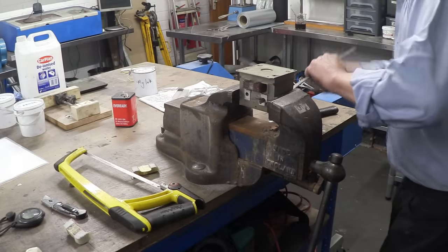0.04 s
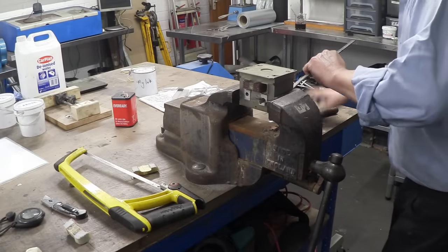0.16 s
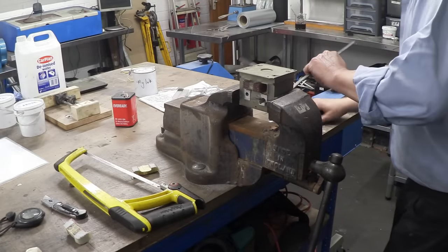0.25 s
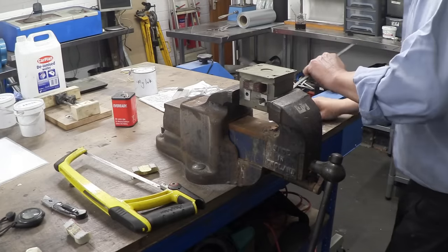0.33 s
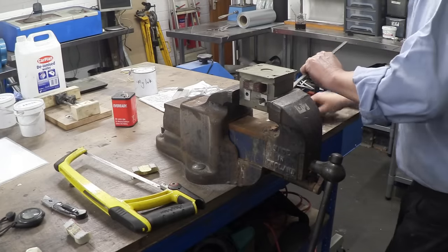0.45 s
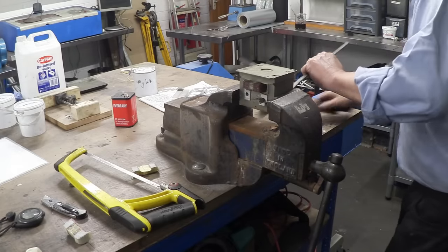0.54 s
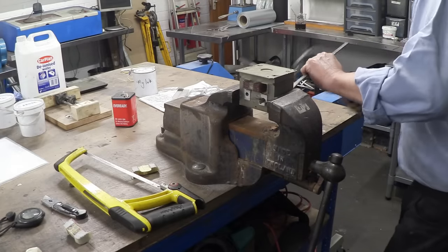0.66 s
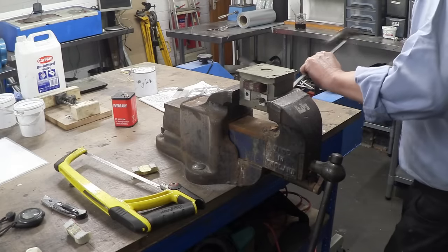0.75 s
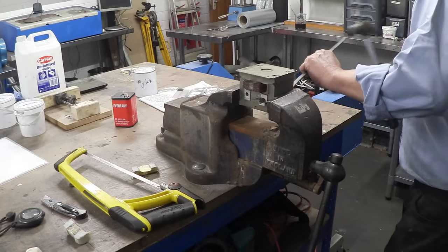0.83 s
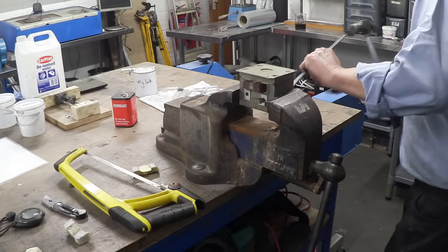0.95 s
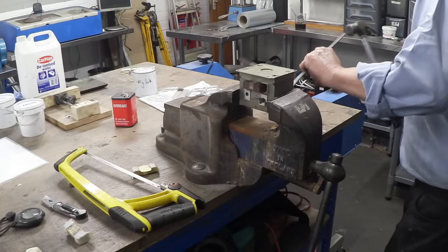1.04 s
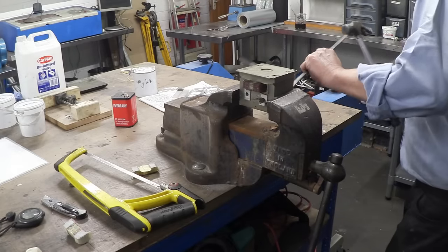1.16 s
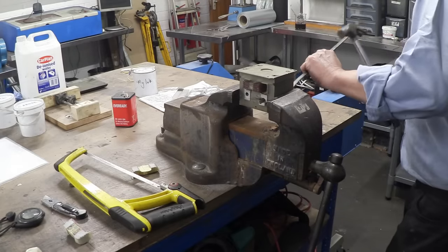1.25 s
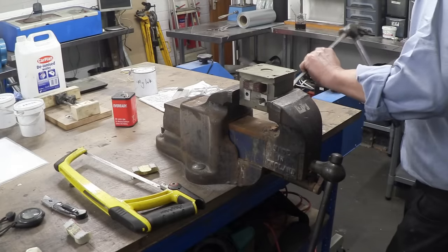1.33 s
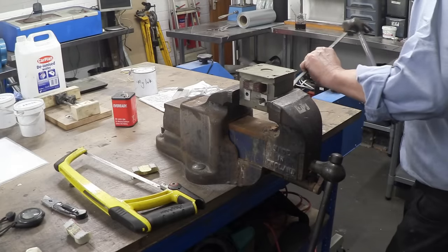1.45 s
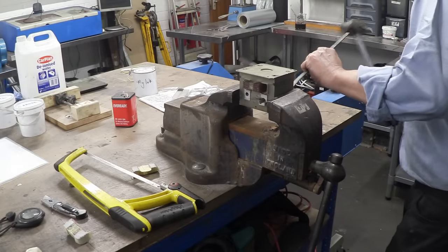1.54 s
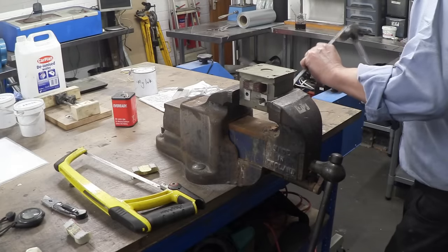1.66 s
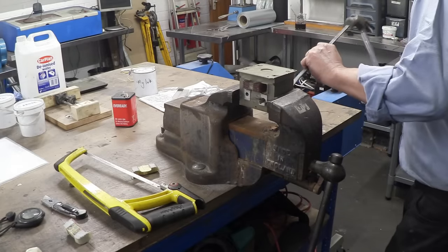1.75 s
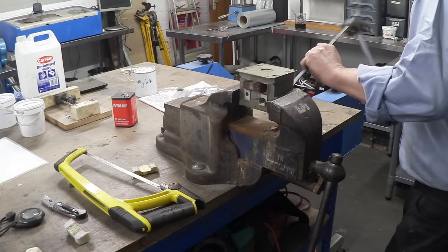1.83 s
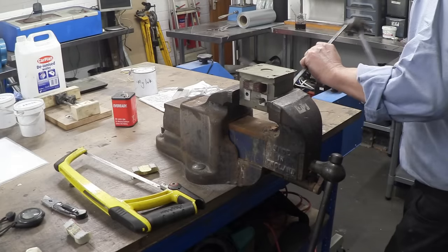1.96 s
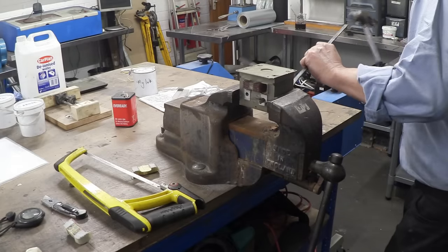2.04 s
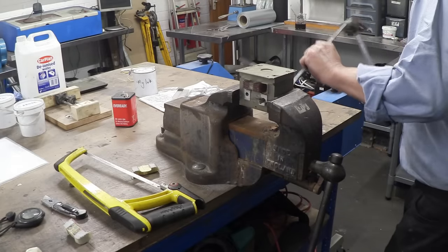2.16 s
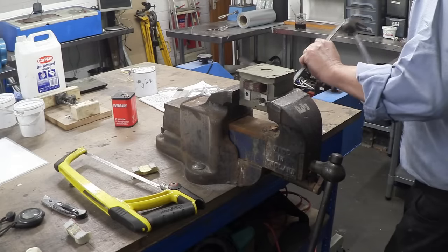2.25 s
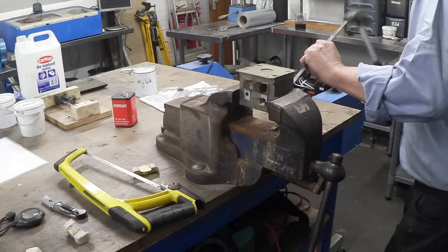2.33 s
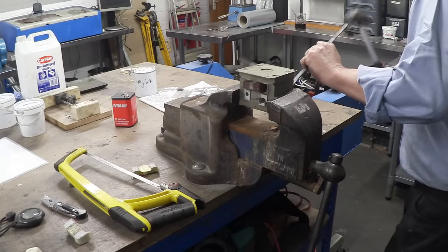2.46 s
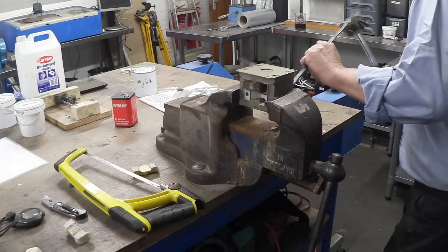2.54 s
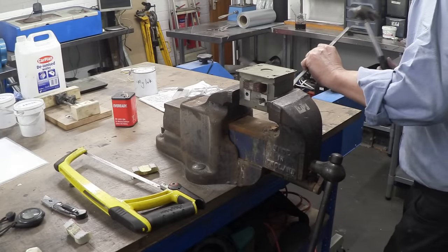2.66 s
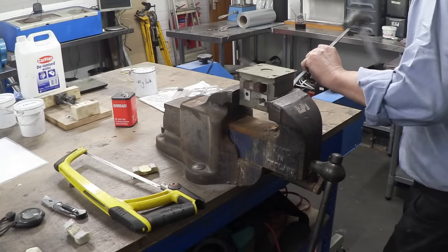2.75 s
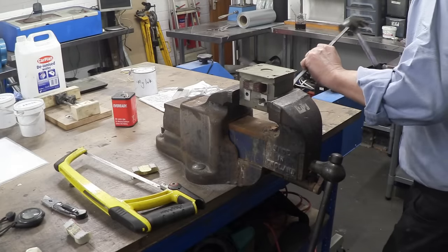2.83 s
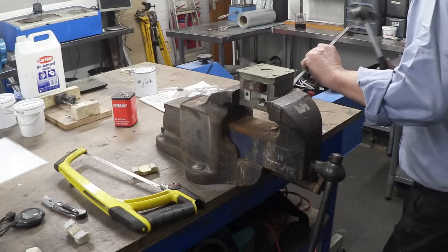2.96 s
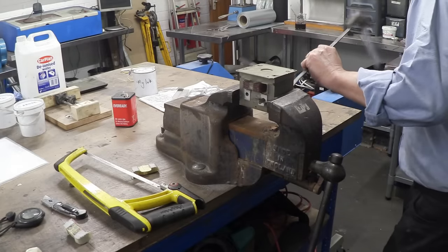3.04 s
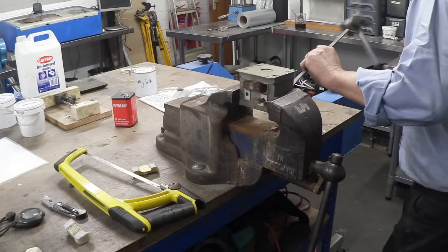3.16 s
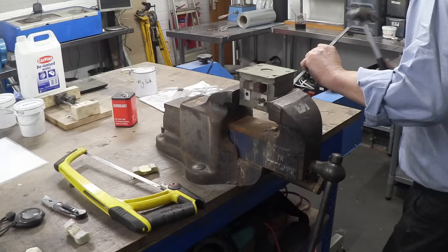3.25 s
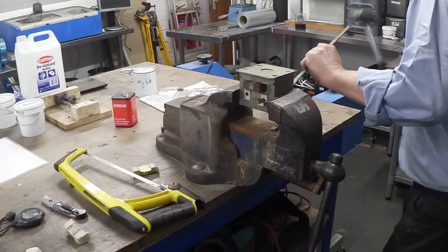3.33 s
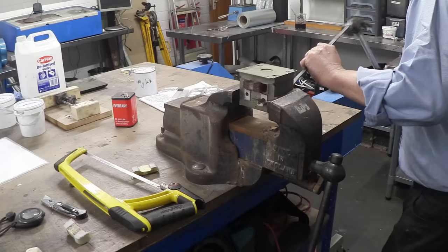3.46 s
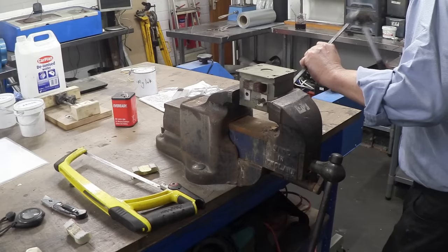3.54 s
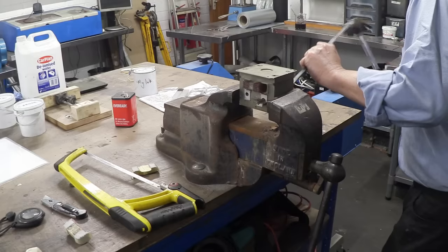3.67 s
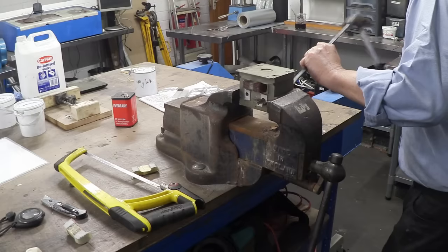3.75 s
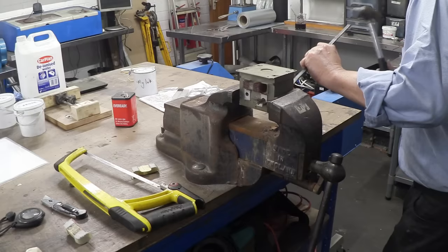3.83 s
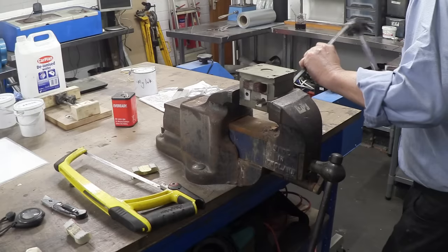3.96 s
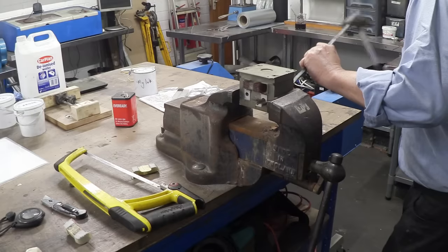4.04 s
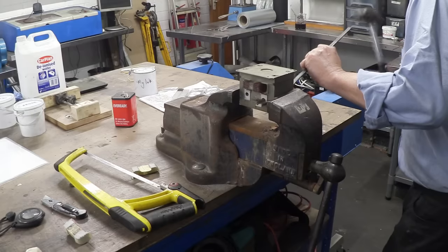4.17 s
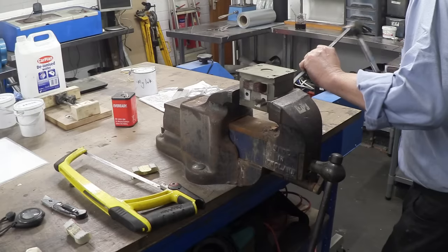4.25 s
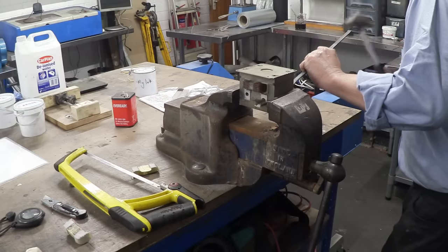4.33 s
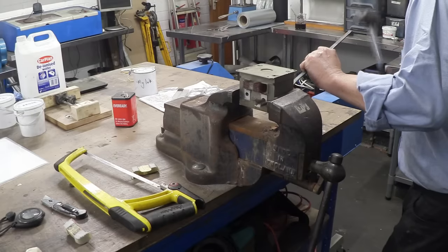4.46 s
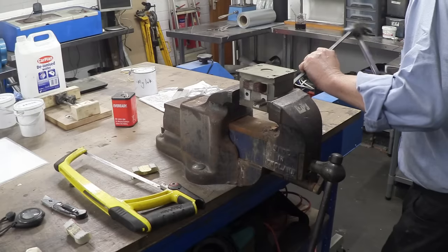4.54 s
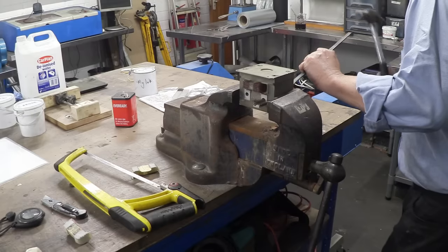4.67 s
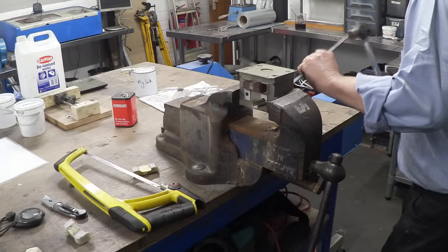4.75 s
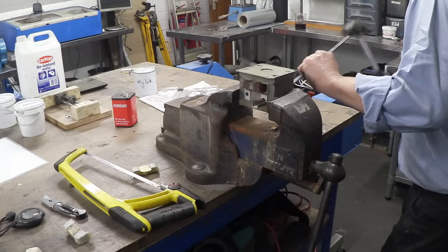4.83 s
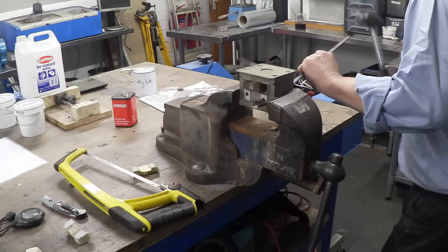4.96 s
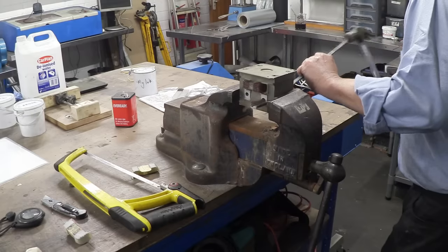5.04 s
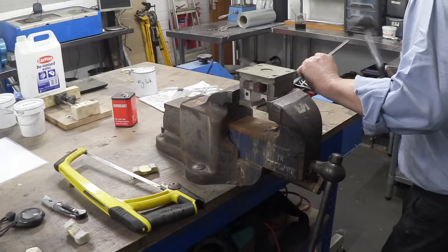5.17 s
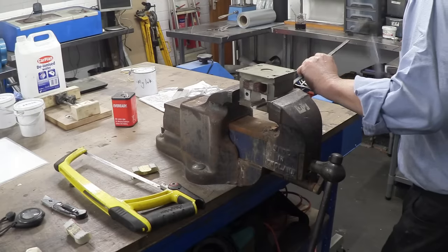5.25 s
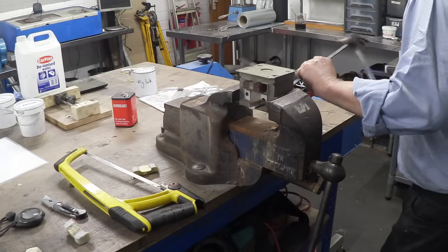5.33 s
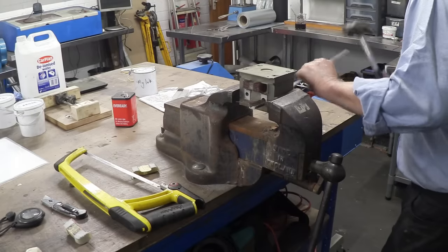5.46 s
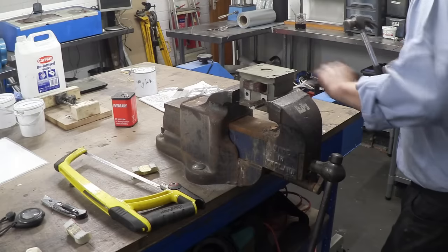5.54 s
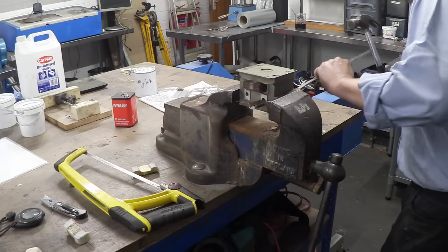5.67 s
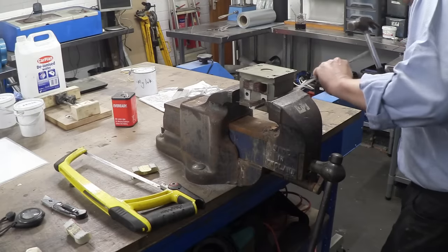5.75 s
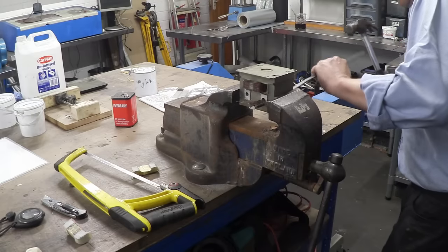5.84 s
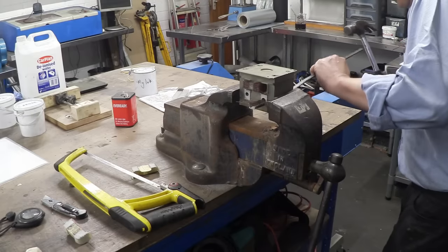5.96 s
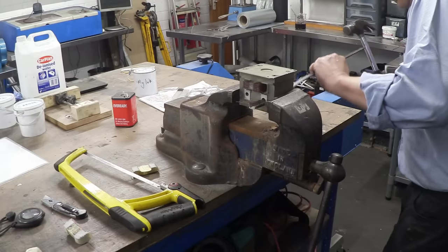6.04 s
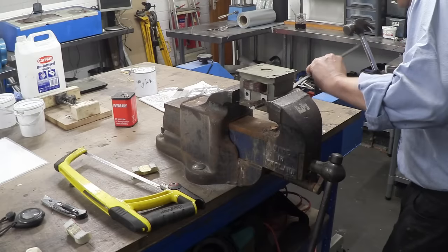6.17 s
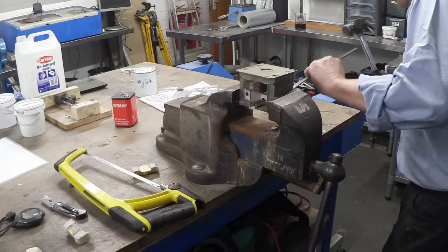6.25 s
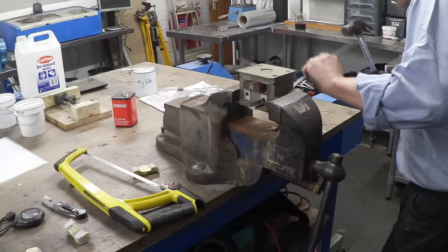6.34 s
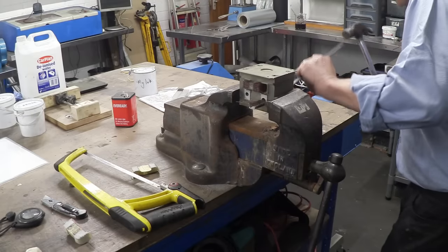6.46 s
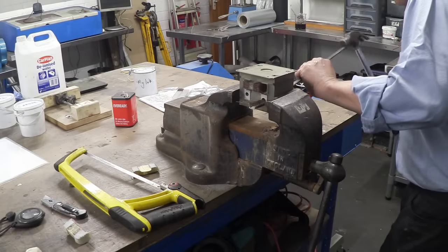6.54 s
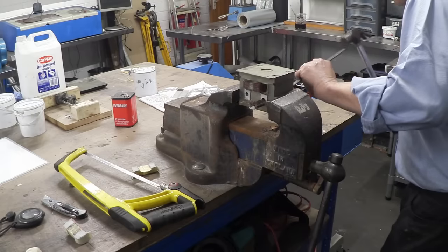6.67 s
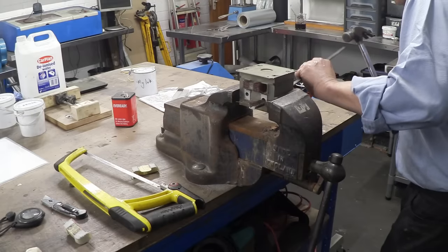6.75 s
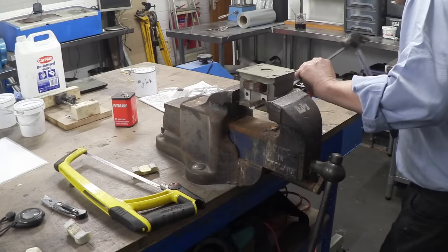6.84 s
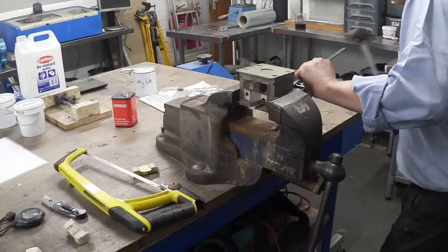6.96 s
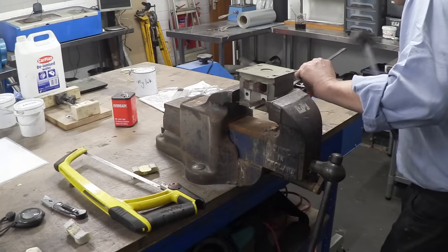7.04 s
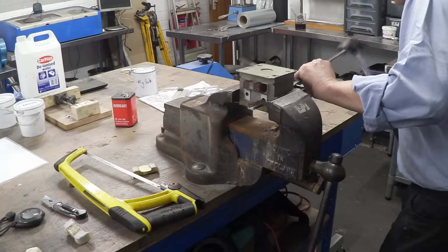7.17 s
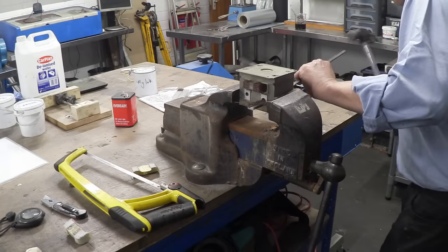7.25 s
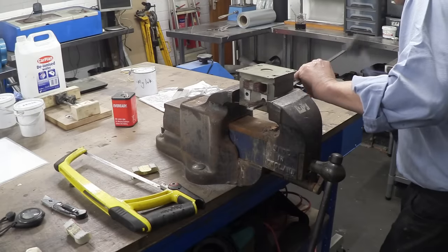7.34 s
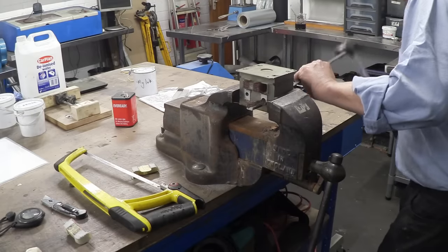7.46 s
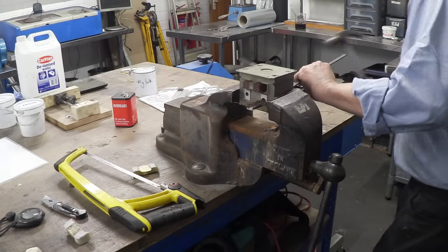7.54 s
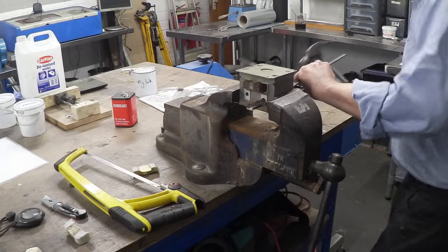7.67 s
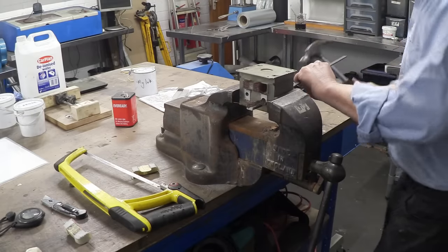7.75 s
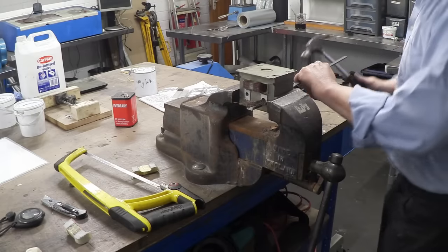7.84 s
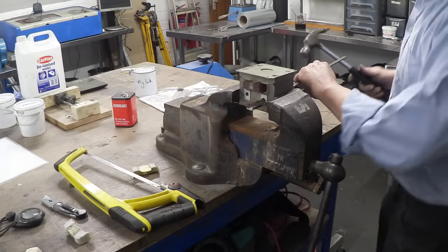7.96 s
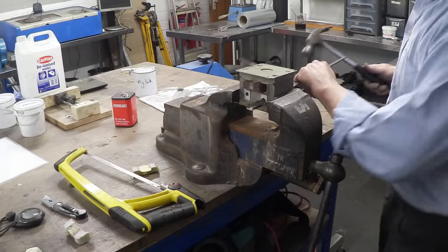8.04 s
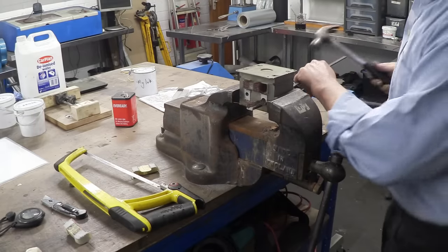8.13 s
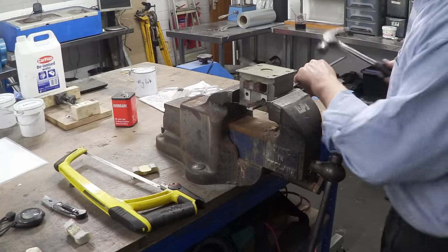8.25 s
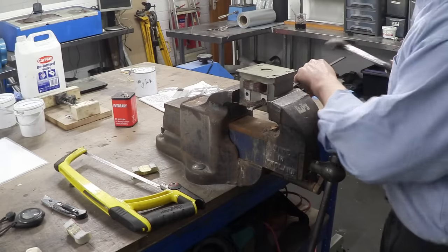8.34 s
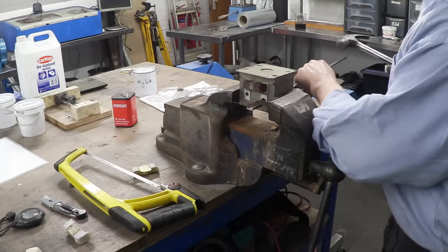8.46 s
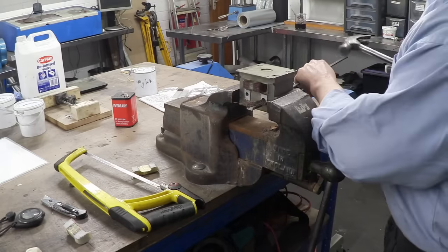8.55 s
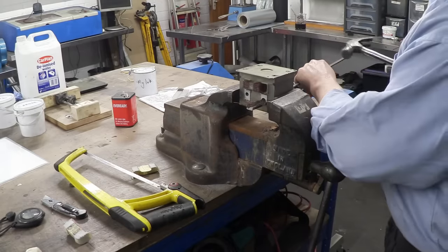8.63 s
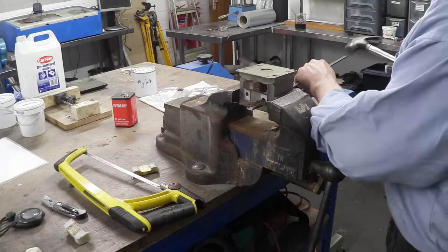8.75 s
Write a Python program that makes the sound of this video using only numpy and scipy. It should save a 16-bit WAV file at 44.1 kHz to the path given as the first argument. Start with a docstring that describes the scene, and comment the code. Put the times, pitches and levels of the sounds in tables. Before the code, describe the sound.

In a small workshop, tools tap and scrape over a faint ventilation murmur. A hammer then strikes a steel bar in a steady run of sharp blows, each with a short ring, a metallic rattle and a thump from the bench. The blows turn brighter and hollower. After a pause with small tool sounds, four more build in force. A few scrapes and a soft sleeve rustle follow, all heard close up.

```python
"""Over a ventilation murmur and a brief hiss, tools tap and scrape on the bench of a small workshop.
From 1.4 s a hammer drives a hand-held steel bar against the coil in a transformer core. Each blow
cracks, rattles the core's sheets, rings the steel and thumps the bench. Between 3 and 4.8 s the coil
works loose and the blows turn brighter and hollower. After a pause with small tool sounds, four more
blows build from 6.7 s. The tools tap and scrape once more, and from 8.1 s a shirt sleeve rustles."""
import sys
import numpy as np
from scipy import signal
from scipy.fft import rfft, irfft
from scipy.io import wavfile
from scipy.ndimage import uniform_filter1d

SR = 44100
rng = np.random.default_rng(int(sys.argv[2]) if len(sys.argv) > 2 else 0)


def file_out(sig):
    """Save sig as 16-bit WAV at sys.argv[1]."""
    # one column per channel
    cols = np.atleast_2d(sig).T
    # limit, then scale
    lim = np.clip(cols, -1, 1)
    pcm = np.round(lim * 32767).astype(np.int16)
    wavfile.write(sys.argv[1], SR, pcm)


N = 388080
EVENT_SAMPLES = 20480
AGE = np.arange(EVENT_SAMPLES) / SR  # seconds into one event
FREQ = np.fft.rfftfreq(EVENT_SAMPLES, 1 / SR) + 1  # frequency axis of an event's EQ, in Hz


def undb(db):
    """Decibels to gain."""
    return 10 ** (np.asarray(db) / 20)


def decay(t60):
    """Exponential decay that falls 60 dB in t60 seconds."""
    return np.exp(-np.log(1000) * AGE / max(t60, 1e-4))


def unit_energy(x):
    """Scale to an energy of 1."""
    return x / np.sqrt(np.sum(x ** 2))


def eq_curve(points, hz=FREQ):
    """Join (freq_hz, value) points on a log-frequency axis."""
    freqs, values = np.transpose(points)
    return np.interp(np.log(hz), np.log(freqs), values)


def bell(hz, width, db):
    """EQ bell of a well-damped resonance; width is a share of its pitch."""
    return db * np.exp(-((FREQ / hz - 1) / width) ** 2)


def equalise(x, eq_db):
    """Minimum-phase EQ, so nothing rings ahead of an attack."""
    size = EVENT_SAMPLES
    cepstrum = irfft(np.log(undb(eq_db)))
    cepstrum[1:size // 2] *= 2
    cepstrum[size // 2 + 1:] = 0
    impulse = irfft(np.exp(rfft(cepstrum)))
    return irfft(rfft(x, 2 * size) * rfft(impulse, 2 * size))[:size]


def white():
    """White noise, one event long."""
    return rng.standard_normal(EVENT_SAMPLES)


def noise_bed(points):
    """Scene-long noise of rms 1, shaped by (freq_hz, level_db) points."""
    gain = undb(eq_curve(points, np.fft.rfftfreq(N, 1 / SR) + 1))
    x = irfft(rfft(rng.standard_normal(N)) * gain, N)
    return x / x.std()


def fader(points):
    """Gain ride through (time_s, level_db) points."""
    return undb(np.interp(np.arange(N) / SR, *np.transpose(points)))


def place(track, start_s, x):
    """Mix an event into a track."""
    i = int(start_s * SR)
    track[i:i + len(x)] += x[:N - i]


# Tone of the ventilation: freq_hz, level_db
VENT_SPECTRUM = [(18, -32.5), (30, -4.5), (66, -4), (204, 0.5), (221, 0.5), (437, -5), (780, -12.5),
                 (889, -11.5), (1590, -15.5), (3140, -15.5), (4080, -17.5), (5740, -19), (16000, -30.5)]


def ventilation(side_db=-9):
    """A steady murmur of air, centred in the bass and wider above."""
    side_spectrum = [(hz, db + min(0, 8 * np.log2(hz / 1200))) for hz, db in VENT_SPECTRUM]
    mid = noise_bed(VENT_SPECTRUM)
    side = undb(side_db) * noise_bed(side_spectrum)
    return undb(-53.5 - 4) * np.array([mid + side, mid - side])


# Swell of the hiss: time_s, level_db
HISS_SWELL = [(0, -61.5), (.7, -56), (1.2, -76), (8.8, -75)]


def hiss():
    """A faint, wide hiss swells and sinks away at the opening."""
    spectrum = [(300, -10.5), (2500, 3.5), (5000, 0), (9000, -2.5), (12500, -2.5), (16000, -18.5)]
    return fader(HISS_SWELL) * np.array([noise_bed(spectrum) for _ in range(2)])


# Bands of the room's reverb: centre_hz, level_db, t60_s, side_db
REVERB_BANDS = [(100, 0, .45, -17), (250, -2.5, 0.13, -20.5), (510.3, 5.5, 0.43, -9.5),
                (1260, -1, 0.23, -2), (2130, -4, 0.25, -6), (4400, -8, 0.29, -4.5), (7850, -2, 0.23, -6),
                (15180, -2.5, 0.21, -5.5)]


def reverb_tail(build_s=0.0062, late_db=-27, late_t60=0.62):
    """Diffuse reflections build fast and die band by band over a faint late tail; gives mid and side."""
    centres_hz = [band[0] for band in REVERB_BANDS]
    onset = 1 - np.exp(-(AGE / build_s) ** 2)
    spectra = rfft(rng.standard_normal((2, EVENT_SAMPLES)))
    mid, side = np.zeros((2, EVENT_SAMPLES))
    for (_, level_db, t60, side_db), solo in zip(REVERB_BANDS, np.eye(len(centres_hz))):
        band = irfft(spectra * eq_curve(np.c_[centres_hz, solo]))
        envelope = unit_energy(onset * (decay(t60) + undb(late_db) * decay(late_t60)))
        tail = band * undb(level_db) * envelope
        mid += tail[0]
        side += undb(side_db) * tail[1]
    return mid, side


# Early reflections off bench top, vice and walls: delay_s, level_db
REFLECTIONS = [(.0055, -9.5), (0.0114, -16), (0.0193, -14), (.0295, -13.5)]


def workshop(x, smear_t60=0.03, scatter_db=-11):
    """The small room from close up, in stereo: direct sound, early reflections and a short tail."""
    mid, side = reverb_tail()
    mid[0] += 1  # direct sound
    # the nearest surface mirrors the sound; cluttered ones further off smear it
    for k, (delay_s, level_db) in enumerate(REFLECTIONS):
        echo = unit_energy(white() * decay(smear_t60 if k else 0))
        mid += undb(level_db) * np.roll(echo, int(delay_s * SR))
    # nearby objects scatter the treble differently to left and right
    scatter = unit_energy(white() * np.sqrt(AGE) * decay(.008))
    side += equalise(scatter, eq_curve([(200, -24), (1200, 1.5), (2500, -5.5), (8000, 8)]) + scatter_db)
    tilt_db = eq_curve([(4000, 0), (8000, -1.3)])
    left, right = equalise(mid + side, tilt_db), equalise(mid - side, -tilt_db)
    return np.array([signal.fftconvolve(x, response)[:N] for response in (left, right)])


# The sleeve's gesture: time_s, speed_db
SLEEVE_MOVE = [(8.14, -62), (8.242, -61.5), (8.264, -54), (8.354, -58), (8.394, -48.5), (8.614, -60),
               (8.662, -46.5), (8.764, -43.5), (8.8, -64)]
# Tone of rubbing cloth: freq_hz, level_db
CLOTH_SPECTRUM = [(240, -4), (500, -0.5), (900, 1.5), (2500, 4), (4380, 2.5), (7630, -0.5), (12900, -13.5),
                  (16000, -26)]


def sleeve(start_s=8.1, fade_in_s=0.13, flutter_db=2.5, trim_db=-1, brighten=0.74):
    """Cloth slides over cloth in small uneven catches; its low rub swells less than its bright hiss."""
    steps = np.repeat(rng.standard_normal(N // 400 + 1), 400)
    catches = uniform_filter1d(steps, size=300)[:N]
    speed = fader(SLEEVE_MOVE)
    fade_in = np.clip((np.arange(N) / SR - start_s) / fade_in_s, 0, 1)
    cloth = noise_bed(CLOTH_SPECTRUM)
    lows = signal.sosfiltfilt(signal.butter(2, 3000, fs=SR, output="sos"), cloth)
    highs = cloth - lows
    rub = highs + lows * (2 * speed / speed.max()) ** -brighten
    return rub * speed * fade_in * undb(trim_db + flutter_db * catches)


# Short scrapes over steel and bench top: start_s, level_db, length_s, centre_hz, width_hz
SCRAPES = [(0.309, -39.5, 0.022, 1860, 6000), (0.315, -41, 0.04, 202, 177), (0.346, -36, 0.035, 2170, 4460),
           (0.428, -44.5, 0.112, 227, 120), (0.432, -49, 0.037, 1370, 4000),
           (0.509, -47.5, 0.044, 1690, 4840), (5.557, -50, 0.039, 1425, 333),
           (6.463, -49, 0.059, 2900, 6900), (6.54, -54, 0.043, 3850, 9000), (7.67, -47, 0.054, 3520, 7860),
           (8.036, -45, 0.052, 2440, 4000)]


def tool_scrapes(grain_db=2, grain_samples=128):
    """Sliding tools send an arc of gritty friction noise through one resonance."""
    track = np.zeros(N)
    for start_s, level_db, length_s, centre_hz, width_hz in SCRAPES:
        friction = white()
        grains = np.repeat(rng.standard_normal(EVENT_SAMPLES // grain_samples), grain_samples)
        arc = np.sqrt(np.clip(4 * AGE / length_s * (1 - AGE / length_s), 0, 1))
        eq_db = -20 * np.log10(1 + ((FREQ ** 2 - centre_hz ** 2) / (FREQ * width_hz)) ** 2)
        # a light, sliding contact is too soft to stir much above its own pitch
        eq_db -= 9 * np.maximum(np.log2(FREQ / (2.5 * centre_hz)), 0)
        stroke = equalise(friction * undb(grain_db * grains) * arc, np.maximum(eq_db, -60))
        place(track, start_s, unit_energy(stroke) * np.sqrt(length_s * SR / 2) * undb(level_db))
    return track


def ring(modes, phases, scatter_db, detune):
    """Decaying modes whose levels and pitches vary a little from hit to hit."""
    chance = rng.standard_normal((len(modes), 2))
    ringing = np.zeros(EVENT_SAMPLES)
    for (hz, db, t60), (louder, sharper), phase in zip(modes, chance, phases):
        tone = np.sin(2 * np.pi * hz * (1 + detune * sharper) * AGE + phase)
        ringing += undb(db + scatter_db * louder) * decay(t60) * tone
    return ringing


def crack_and_rattle(force_db, rise_s=0.00073, crack_t60=0.018, rattle_t60=0.11):
    """Dense, heavily damped modes: a crack, then the core's sheets chatter, more so under a hard blow."""
    attack = 1 - np.exp(-AGE / rise_s)
    rattle = undb(-17 + .4 * force_db) * decay(rattle_t60)
    return unit_energy(white() * attack * (decay(crack_t60) + rattle))


# Tone of the steel's crack: freq_hz, gain_db
CRACK_EQ = [(60, -14.5), (250, 11), (450, 18), (700, 11), (1100, 13), (1900, 24.5), (3000, 24), (4000, 26),
            (5500, 23), (6600, 16), (8000, 17), (10300, 16), (13000, 8), (16000, -7.5)]
# Ring of bar, core and vice: pitch_hz, level_db, t60_s
STEEL_MODES = [(1400, -30, .17), (1440, -27, .2), (1530, -35, .2), (1869, -29, .16), (2134, -25, .2),
               (2284, -29, .17), (2604, -28, .16), (2736, -29, .2), (3047, -27, .18), (3250, -30, .14),
               (3446, -30, .15), (3797, -29, .18), (3900, -31, .2), (4073, -29, .15), (4231, -29, .14),
               (4960, -29, .15), (5553, -29, .13), (7780, -35, .17), (8060, -33, .17), (9330, -37, .14),
               (10150, -36, .12)]


def steel_hit(contact, eq_db, ring_db):
    """Steel meets steel: a bright crack and a brief ring, both shaped by the hit's EQ."""
    phases = rng.uniform(0, 2 * np.pi, len(STEEL_MODES))
    ringing = undb(ring_db) * ring(STEEL_MODES, phases, scatter_db=2.5, detune=.003)
    crack = equalise(contact, eq_curve(CRACK_EQ))
    return equalise(crack + ringing, eq_db)


def hollow_core_eq():
    """The core's hollow note, heard under every light tap and in the blows as the coil loosens."""
    return bell(hz=1394, width=.08, db=8)


# Light taps of steel on steel: start_s, level_db, centre_hz, rolloff_db_per_octave
TOOL_TAPS = [(0.315, -25.5, 1300, 5.5), (0.367, -25, 1400, 5), (1.672, -24, 1450, 4.5),
             (1.784, -20, 4430, 6.5), (4.742, -27, 6900, 16), (5.709, -35, 6750, 24),
             (5.847, -31.5, 6810, 35), (6.232, -39, 1450, 8.5), (8.092, -28.5, 1710, 2)]


def tool_taps():
    """Tools are picked up and the bar is seated: soft ticks, each focused around its own pitch."""
    track = np.zeros(N)
    for start_s, level_db, centre_hz, rolloff in TOOL_TAPS:
        focus_db = np.maximum(-rolloff * np.abs(np.log2(FREQ / centre_hz)), -60)
        contact = crack_and_rattle(force_db=-20)
        place(track, start_s, steel_hit(contact, level_db + focus_db + hollow_core_eq(), ring_db=-10))
    return track


# Body of the loaded bench: pitch_hz, level_db, t60_s
BENCH_MODES = [(78, -42, .45), (85, -36.5, .32), (112, -39, .4), (130, -44, .45), (153, -35.5, .32),
               (187, -37, .33), (208, -36, .36), (230, -38, .42), (246, -35, .46), (264, -40, .42),
               (300, -43, .3), (345, -42, .3), (395, -42, .28), (425, -42, .26), (450, -38, .3),
               (482, -41, .3), (522, -38, .36), (545, -42, .32), (622, -43, .24), (705, -39, .2),
               (765, -39, .18), (831, -36, .2), (900, -42, .15), (960, -44, .15)]


def bench_thump(phases, eq_db, rise_s=0.014):
    """The heavy bench takes a few cycles to get moving, then booms in its low modes."""
    body = ring(BENCH_MODES, phases, scatter_db=-0.5, detune=0.0062)
    return equalise(body * (1 - np.exp(-AGE / rise_s)), eq_db)


def blow_eq(force_db, thump_db, knock_db, looseness):
    """Balance of one blow: bench and vice below, steel above, brighter when hard or on a loose coil."""
    sub_db = force_db + 0.25 * (thump_db - force_db) - 1 + 2 * looseness
    mid_db = (1 - 0.34) * force_db - 3.5
    treble_db = (1 + 0.28) * force_db + np.interp(looseness, (0, 1), (-0.6, 3))
    return eq_curve([(90, sub_db), (190, thump_db), (450, knock_db), (750, knock_db), (1300, mid_db),
                     (2200, mid_db), (2800, force_db), (5800, force_db), (8000, treble_db)])


def bar_clank_eq(clank_hz, clank_db, width=0.17, sing_hz=8020):
    """The bar's clank and overtone; a high steel mode sings when the overtone comes near it."""
    overtone_hz = 2.02 * clank_hz
    in_tune = np.exp(-((overtone_hz / sing_hz - 1) / .1) ** 2)
    clank = bell(clank_hz, width, clank_db)
    overtone = bell(overtone_hz, width / 2, 0.18 * clank_db)
    sing = bell(sing_hz, width=.04, db=7.5 * in_tune)
    return clank + overtone + sing


# Hammer blows; the clank's pitch moves with grip and seating:
# start_s, force_db, bench_thump_db, vice_knock_db, clank_hz, clank_db
HAMMER_BLOWS = [(1.3534, -22.5, -5.5, -8, 4130, 4.5), (1.954, -6, 0, -2.5, 3100, 10),
                (2.2373, -1, -2.5, 3.5, 2720, 2), (2.561, -1.5, -1, 3.5, 2650, 6),
                (2.8642, -0.5, 6.5, 0, 2360, 5), (3.1515, 1, 2.5, -2.5, 4250, 1),
                (3.4602, 1, 0.5, -6, 3940, 2.5), (3.7415, 0.5, 0.5, -7.5, 3850, 5),
                (4.0268, 0.5, -6, -4, 3970, 0.5), (4.302, 2, -8, -3.5, 2640, 1.5),
                (4.5747, 2, -4.5, -5, 3370, 1), (4.8418, 1, -0.5, -0.5, 3100, 4),
                (5.1084, 0, -2.5, -2, 2400, 8.5), (5.3647, 0, -2.5, -3.5, 2150, 10.5),
                (6.6679, -23, -10.5, -11.5, 2470, 6.5), (6.9214, -8.5, -7, -7, 2040, 7.5),
                (7.1785, 0.5, -6, -5.5, 1940, 4), (7.4308, 0.5, -5.5, -5.5, 2030, 7)]


def hammering(loosening_s=(3, 4.8), carry_over=0.3, steel_trim_db=-3):
    """The hammer drives the bar and works the coil loose; gives a steel stem and a bench stem."""
    steel, bench = np.zeros((2, N))
    bench_phases = rng.uniform(0, 2 * np.pi, len(BENCH_MODES))
    contact = crack_and_rattle(force_db=0)
    for start_s, force_db, thump_db, knock_db, clank_hz, clank_db in HAMMER_BLOWS:
        # the bar shifts only a little, so each blow resembles the one before
        fresh = np.sqrt(1 - carry_over ** 2) * crack_and_rattle(force_db)
        contact = unit_energy(carry_over * contact + fresh)
        looseness = np.interp(start_s, loosening_s, (0, 1))
        eq_db = blow_eq(force_db, thump_db, knock_db, looseness)
        resonance_db = bar_clank_eq(clank_hz, clank_db) + looseness * hollow_core_eq()
        ring_db = -6 + .35 * force_db  # a light blow hardly sets the vice ringing
        place(steel, start_s, steel_hit(contact, eq_db + resonance_db + steel_trim_db, ring_db))
        place(bench, start_s, bench_thump(bench_phases, eq_db))
    return steel, bench


def scene():
    """Steel, tools and sleeve play through the room; the bench's thump sits dry in both channels."""
    steel, bench = hammering()
    foley = tool_taps() + tool_scrapes() + sleeve()
    return workshop(steel + foley) + undb(3.5) * bench + ventilation() + hiss()


def record(dry):
    """Soft saturation rounds the highest peaks and a steep low-pass cuts the top."""
    lowpass = signal.ellip(10, .2, 70, 15900, fs=SR, output="sos")
    return signal.sosfilt(lowpass, np.tanh(dry))


dry = scene()
out = record(dry)
file_out(out)
```